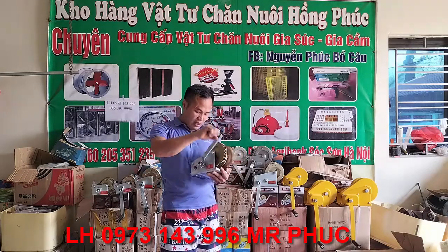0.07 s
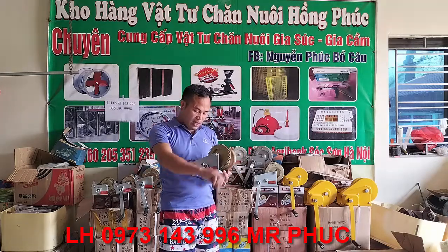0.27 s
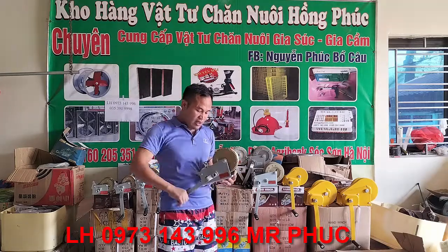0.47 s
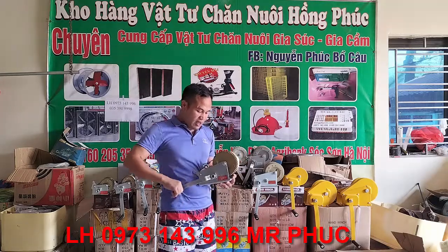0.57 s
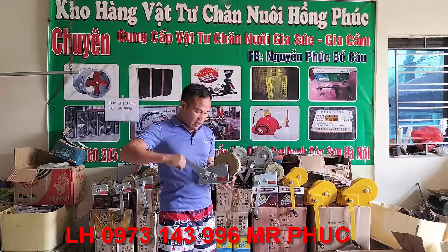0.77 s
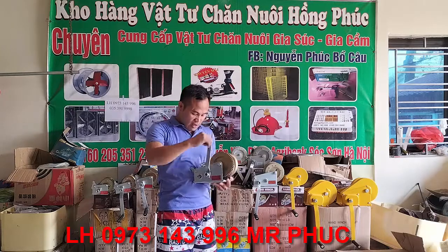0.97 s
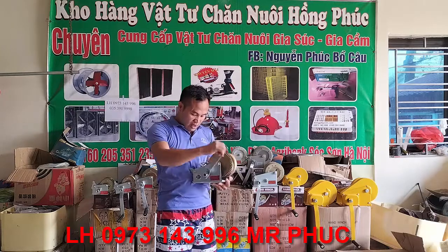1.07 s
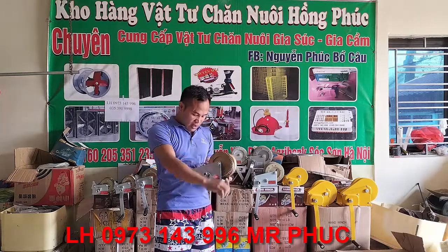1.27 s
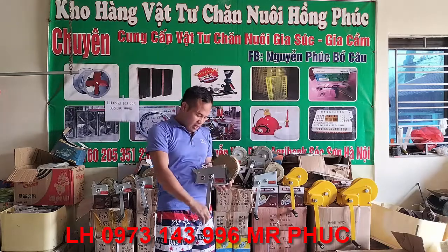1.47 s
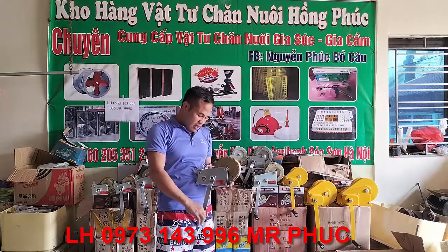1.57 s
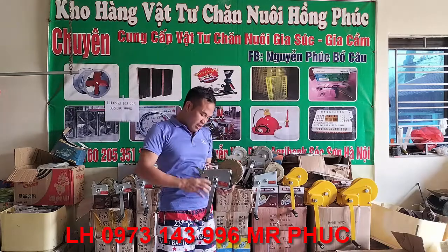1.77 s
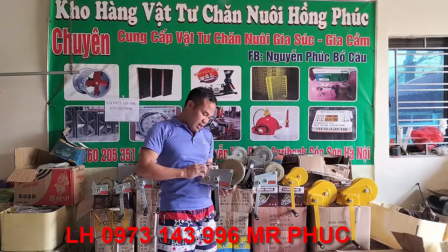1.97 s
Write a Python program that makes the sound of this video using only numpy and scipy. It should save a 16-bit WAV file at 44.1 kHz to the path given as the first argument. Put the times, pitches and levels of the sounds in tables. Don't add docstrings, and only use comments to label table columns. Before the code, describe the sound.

Hand winch ratchet clatters in rapid loud metal clicks, stops hard, then faint rubbing and taps

```python
import sys
import numpy as np
from scipy import signal
from scipy.fft import rfft, irfft
from scipy.io import wavfile
from scipy.ndimage import uniform_filter1d

SR = 44100
rng = np.random.default_rng(int(sys.argv[2]) if len(sys.argv) > 2 else 0)


def log_audio(samples):
    frames = np.atleast_2d(samples).T
    limited = np.clip(frames, -1, 1)
    pcm = np.round(limited * 32767).astype(np.int16)
    wavfile.write(sys.argv[1], SR, pcm)


def gain_from_db(level_db):
    decades = np.asarray(level_db, float) / 20
    return 10 ** decades


N = 88464
LEAD = 4410
TOTAL = N + LEAD

# frequency in Hz, level in dB per Hz.
HALL_SPECTRUM = [(25, -63), (60, -37), (100, -7.5), (650, -8), (1400, -5.5), (1900, -20), (3700, -12),
                 (9000, -37.5)]
# frequency in Hz, level in dB per Hz.
SHUDDER_SPECTRUM = [(15, -8), (40, -0.5), (120, -5), (400, -4), (700, -10.5)]
# start in seconds, length in seconds, frequency in Hz,
# width in Hz, level in dB.
SWELLS = [(0.89, 0.14, 965, 110, -46), (1.193, 0.19, 800, 8.6, -54.5), (1.36, .16, 132, 17, -57.5),
          (1.7, 0.067, 5400, 80, -72), (1.47, 0.11, 6000, 73, -64), (0.71, 0.074, 2200, 130, -51),
          (1.764, 0.43, 334, 130, -58), (1.418, 0.23, 1170, 500, -53.5), (1.4, 0.038, 2650, 40, -56),
          (0.412, 0.16, 700, 61, -41), (.63, 0.084, 830, 40, -40)]
# time in seconds, level in dB.
SQUEAK_LEVEL = [(.9, -74), (.99, -50.5), (1.07, -63), (1.11, -56), (1.2, -67), (1.34, -84), (1.4, -64),
                (1.52, -74), (1.6, -74)]
# time in seconds, level in dB.
RUB_LEVEL = [(.86, -55), (.905, -46), (.94, -50), (.965, -40.5), (.995, -44.5), (1.05, -53), (1.085, -44),
             (1.14, -48), (1.18, -56.5), (1.33, -60.5), (1.385, -55), (1.43, -57), (1.51, -56), (1.59, -73)]
# frequency in Hz, level in dB per Hz.
CRACK_SPECTRUM = [(60, -40), (150, -62), (580, -27), (800, 6.5), (1150, -5.5), (3800, 2), (7200, 0.5),
                  (8500, 1.5)]
# frequency in Hz, level in dB, t60 in seconds.
CRANK_MODES = [(866, -10.5, .15), (939.6, -8.5, 0.067), (1350, -13, 0.085), (1674, -10, 0.065),
               (1900, -16, 0.03), (2200, -3, 0.087), (2428, -6, .07), (3820, -7, 0.13), (4410, -17, 0.073),
               (4713, -9.5, 0.11), (4855, -12.5, 0.089), (6320, -10, 0.087), (6950, -6.5, 0.054),
               (2680, -10.5, 0.035)]
# frequency in Hz, level in dB, t60 in seconds.
HELD_FRAME_MODES = [(714, -2, 0.023), (1080, -8, 0.033), (1592, -0.9, 0.029), (1890, -6.5, 0.038),
                    (2336, -9, 0.026), (2590, -10, 0.17), (3740, -5.5, .05), (4500, -24, 0.028)]
# frequency in Hz, level in dB, t60 in seconds.
LEVER_MODES = [(783, -12, 0.054), (1036, -9, 0.055), (2250, -3.5, 0.088), (2710, -5, 0.056),
               (3450, -12, .04), (3804, -5, 0.072), (4440, -1, 0.046), (4900, -1, 0.1), (5140, -6, 0.037),
               (5700, -6, .04), (6600, -8, 0.037), (7250, 3, 0.076)]
# frequency in Hz, level in dB, t60 in seconds.
FRAME_MODES = [(798.4, -10, 0.13), (909, -11, 0.087), (1286, -9, 0.05), (1585, -7, 0.07), (1664, -16, 0.16),
               (1891, -9.5, 0.07), (2138, -8.5, 0.051), (2790, -3, 0.033), (3584, -8, 0.099),
               (3873, -6.5, 0.13), (4403, -9.5, 0.045), (4766, -1, 0.092), (5666, -7.5, 0.081),
               (7320, -1.5, 0.049)]
# time in seconds, peak in dB, brightness in dB per octave.
HAND_KNOCKS = [
    (1.769, -34.5, -2.5),
    (1.785, -39, -2),
    (1.9, -57, -4),
    (1.942, -50.5, -8.5),
    (1.9, -42, 5),
    (0.95, -30, 2.5),
]
# time in seconds, peak in dB, brightness in dB per octave.
LEVER_TAPS = [
    (1.617, -30.5, -3.3),
    (1.634, -35, -6),
    (1.664, -40, 4),
    (1.68, -46, 2.3),
]
# time in seconds, peak in dB, brightness in dB per octave.
CRANK_STOP = [
    (.602, -10.5, 1),
    (.61, -14, -2.6),
    (.624, -22, 5.7),
    (.638, -20, 0.5),
]
# time in seconds, peak in dB.
EARLIER_TEETH = [
    (-.056, -5),
    (-.014, -13),
]
# time in seconds, peak in dB, brightness in dB per octave.
RATCHET_TEETH = [(0.0268, -9.5, 0), (0.0692, -9, -1.3), (0.1087, -6.5, -0.8), (0.1476, -12.5, 3.3),
                 (0.1864, -15.5, 0.1), (0.2214, -16, 1.5), (0.2668, -13.5, 1), (0.3082, -12.5, 1.5),
                 (0.3526, -8, 0.4), (0.3935, -11.5, 4.1), (0.4344, -19.5, -1.4), (0.4764, -14.5, -1),
                 (0.5194, -16.5, 0.8), (0.5594, -28.5, 10)]


def rms_one(x):
    return x / np.sqrt(np.mean(x ** 2) + 1e-20)


def curve(rows):
    s, db = np.transpose(rows)
    t = (np.arange(TOTAL) - LEAD) / SR
    return gain_from_db(np.interp(t, [s[0] - .05, *s, s[-1] + .05], [-100, *db, -100]))


def colour(x, spectrum):
    hz = np.maximum(np.arange(len(x) // 2 + 1) * SR / len(x), 1)
    points_hz, points_db = np.transpose(spectrum)
    gain_db = np.interp(np.log(hz), np.log(points_hz), points_db, right=-80)
    return irfft(rfft(x) * gain_from_db(gain_db), len(x))


def ring(clicks, hz, t60):
    decay = gain_from_db(-60 / (t60 * SR))
    w = 2 * np.pi * hz / SR
    return signal.lfilter([0, np.sin(w)], [1, -2 * decay * np.cos(w), decay * decay], clicks + 1e-18)


def narrow(hz, width_hz):
    t60 = 1.4 / width_hz
    once = ring(rng.standard_normal(TOTAL), hz, t60)
    return rms_one(ring(once, hz, t60))


def hall_noise():
    slow = uniform_filter1d(rng.standard_normal(N), size=2000)
    slow = rms_one(uniform_filter1d(slow, size=2000))
    level_db = -53 + 0.6 * slow
    return gain_from_db(level_db) * rms_one(colour(rng.standard_normal(N), HALL_SPECTRUM))


def shudder(winch):
    loudness = np.sqrt(uniform_filter1d(winch ** 2, size=1500) + 1e-12)
    return gain_from_db(-26.5) * loudness * rms_one(colour(rng.standard_normal(N), SHUDDER_SPECTRUM))


def room(x):
    t60_s, rise_s = 0.44, 0.014
    t = np.arange(SR) / SR
    echo = rng.standard_normal(SR) * gain_from_db(-60 * t / t60_s) * (1 - np.exp(-t / rise_s))
    return signal.fftconvolve(x, echo / np.sqrt(np.sum(echo ** 2)))[:len(x)]


def coasting_hums():
    t = (np.arange(TOTAL) - LEAD) / SR
    out = np.zeros(TOTAL)
    for start, length, hz, width_hz, db in SWELLS:
        swell = np.sin(np.pi * np.clip((t - start) / length, 0, 1))
        out += gain_from_db(db) * swell * narrow(hz, width_hz)
    return out


def axle_squeak():
    return curve(SQUEAK_LEVEL) * gain_from_db(5.5) * narrow(hz=7330, width_hz=30)


def gear_rubbing():
    contacts_per_s = 2500
    grains = (rng.random(TOTAL) < contacts_per_s / SR) * rng.standard_normal(TOTAL)
    body = rms_one(sum(gain_from_db(db) * ring(grains, hz, t60 / 2) for hz, db, t60 in CRANK_MODES))
    crackle = gain_from_db(2) * rms_one(colour(grains, CRACK_SPECTRUM))
    return curve(RUB_LEVEL) * gain_from_db(-4) * (body + crackle)


def chatter(rows, hz, level_db):
    length_s, loss_db, spread_db = 0.018, 7, 3
    s, db, tilt = np.transpose(rows)
    lags = rng.random((len(s), 8)) ** 2
    draws = rng.standard_normal((len(s), 9))
    force, uneven_db = draws[:, :8], spread_db * draws[:, 8]
    lags[:, 0] = 0.02 * lags[:, 0]
    force[:, 0] = 1.57 * np.sign(force[:, 0])
    gain = gain_from_db(db + level_db - 19.5 + tilt * np.log2(hz / 3000) + uneven_db)
    at = ((s[:, None] + length_s * lags) * SR).astype(int) + LEAD
    clicks = np.zeros(TOTAL)
    clicks[at] = gain[:, None] * gain_from_db(-loss_db * lags) * force
    return clicks


def steel_crack(rows, crack_db):
    t60_s, rise_s = 0.11, 0.001
    s, db, _ = np.transpose(rows)
    strikes = np.zeros(TOTAL)
    strikes[(s * SR).astype(int) + LEAD] = gain_from_db(db + crack_db - 15)
    fade = signal.lfilter([1], [1, -gain_from_db(-60 / (t60_s * SR))], strikes + 1e-18)
    rise = 1 / (rise_s * SR)
    fade = signal.lfilter([rise], [1, rise - 1], fade)
    return 2 * colour(fade * rng.standard_normal(TOTAL), CRACK_SPECTRUM)


def blows(rows, modes, crack_db):
    out = np.zeros(TOTAL)
    for hz, level_db, t60 in modes:
        for side in (-2.58, -1.19, -0.058, 1.15, 1.9):
            clicks = chatter(rows, hz, level_db)
            detune = 0.0085 * side * rng.uniform(0.49, 1.55)
            out += ring(clicks, hz * (1 + detune), t60 / (1 + 0.65 * abs(side)))
    out += steel_crack(rows, crack_db)
    return signal.sosfilt(signal.butter(4, 704, "high", fs=SR, output="sos"), out)


def hand_knocks():
    return blows(HAND_KNOCKS, HELD_FRAME_MODES, crack_db=-11)


def lever_taps():
    return blows(LEVER_TAPS, LEVER_MODES, crack_db=7.0)


def crank_stop():
    return blows(CRANK_STOP, CRANK_MODES, crack_db=2.5)


def ratchet():
    earlier = [(s, db, 0) for s, db in EARLIER_TEETH]
    return blows(earlier + RATCHET_TEETH, FRAME_MODES, crack_db=4.3)


def scene():
    hits = ratchet() + crank_stop() + hand_knocks()
    taps = lever_taps()
    echo = room(hits + gain_from_db(-6) * taps)
    turning = gear_rubbing() + axle_squeak() + coasting_hums()
    winch = (hits + taps + echo + turning)[LEAD:]
    return (winch + shudder(winch) + hall_noise())[None]


def roll_off(x):
    return signal.sosfilt(signal.butter(12, 16100, fs=SR, output="sos"), x)


def record(dry):
    edge_hz, step_hz = 7700, 3920
    top_db, second_copy_db, noise_db = -20, -24.5, 2.5
    low = signal.sosfiltfilt(signal.butter(8, edge_hz, fs=SR, output="sos"), dry)
    below_edge = signal.butter(6, [edge_hz - step_hz, edge_hz], "band", fs=SR, output="sos")
    band = signal.hilbert(signal.sosfiltfilt(below_edge, dry))
    shift = np.exp(2j * np.pi * step_hz * np.arange(N) / SR)
    top = np.real(band * shift * (gain_from_db(top_db) + gain_from_db(second_copy_db) * shift))
    above_edge = signal.butter(4, edge_hz, "high", fs=SR, output="sos")
    hiss = signal.sosfiltfilt(above_edge, rng.standard_normal(N))
    hiss = hiss * uniform_filter1d(np.abs(band), size=200) * gain_from_db(top_db + noise_db)
    ceiling = signal.ellip(10, .2, 35, 15680, fs=SR, output="sos")
    whole = signal.sosfilt(ceiling, low + top + hiss)
    return roll_off(whole)


dry = scene()
out = record(dry)
log_audio(out)
```